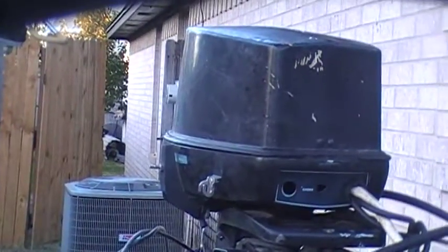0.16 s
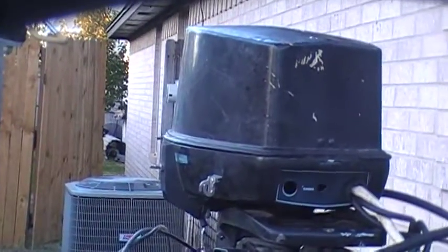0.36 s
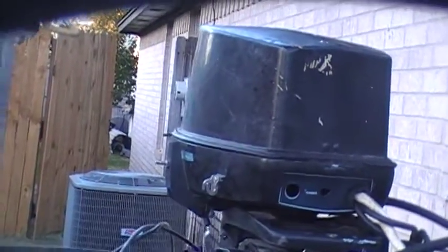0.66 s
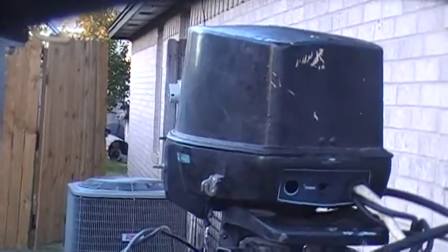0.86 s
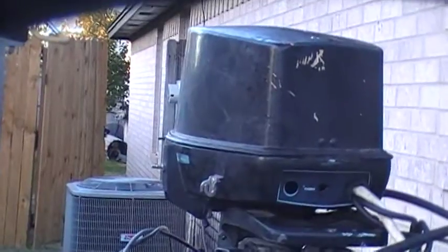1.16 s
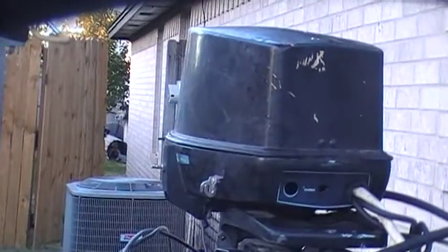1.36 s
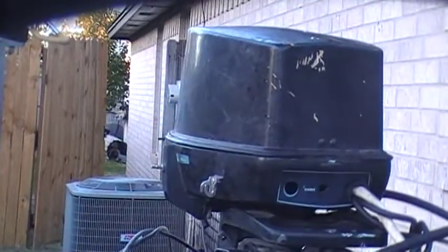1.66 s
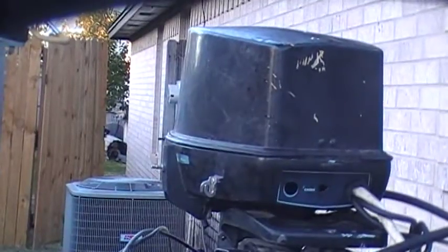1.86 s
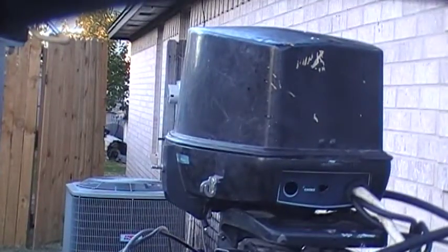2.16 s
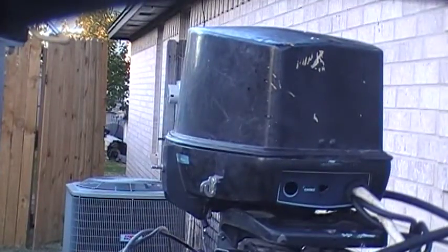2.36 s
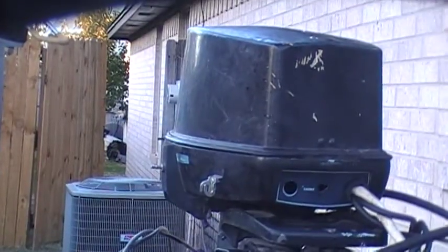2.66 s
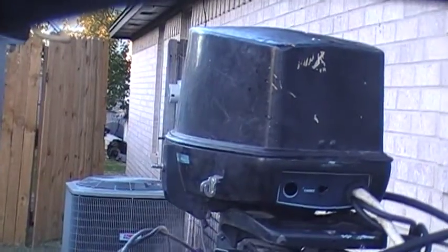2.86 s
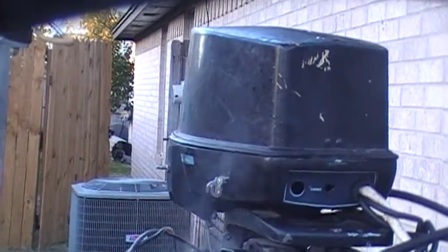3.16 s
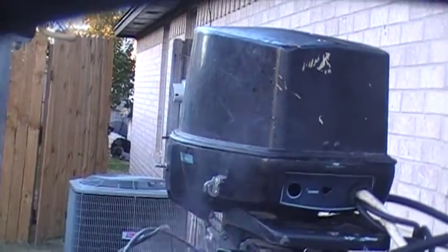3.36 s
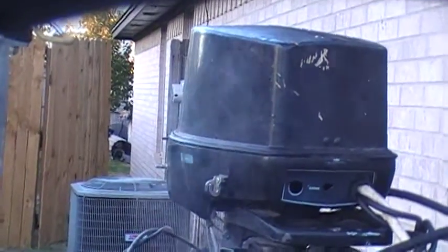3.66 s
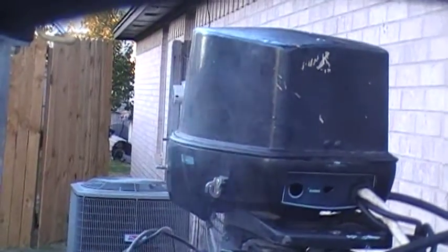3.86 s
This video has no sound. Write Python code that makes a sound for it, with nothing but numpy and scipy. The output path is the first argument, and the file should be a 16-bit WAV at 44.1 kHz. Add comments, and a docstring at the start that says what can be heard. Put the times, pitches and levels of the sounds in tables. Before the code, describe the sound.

An old outboard motor is started beside a brick wall, heard close, with a short outdoor reflection. Light ticks, then a loud metallic clash at 0.2 s, brief grinding and a rattle coasting down with a fading hum by 1.3 s. Soft fan rush, high cricket and small ticks remain. At 2.47 s it clashes again, cranks and grinds until about 2.9, then catches, knocking faster with sharp exhaust spits to 4 s.

```python
"""A fan hums and a cricket sings one high tone; then light ticks lead to an old outboard motor on a stand
beside a brick wall. The starter clashes into the flywheel and grinds; the engine coasts to a stop,
is cranked again, catches and picks up speed, spitting at the exhaust. Shaped noise makes rush, hiss and
thud; random impacts through resonances make rattle and scrape; oscillators make blade, mesh and exhaust
tones; decaying bursts make ticks, clashes and spits; a noise tail is the wall's answer."""
import sys
import numpy as np
from scipy import signal
from scipy.fft import rfft, irfft, next_fast_len
from scipy.io import wavfile
from scipy.ndimage import uniform_filter1d, map_coordinates

SR = 44100
rng = np.random.default_rng(int(sys.argv[2]) if len(sys.argv) > 2 else 0)


def wav_record(signal):
    """Record a signal, one row per channel, as 16-bit PCM in the file named by sys.argv[1]."""
    frames = np.transpose(np.atleast_2d(signal))
    bounded = np.clip(frames, -1, 1)
    # unit amplitude maps onto the largest positive 16-bit level
    quanta = np.round(bounded * 32767).astype(np.int16)
    wavfile.write(sys.argv[1], SR, quanta)


N = 176400
T = np.arange(N) / SR


def amp(db):
    """Decibel law: amplitude is ten to a twentieth of the level."""
    return 10 ** (np.asarray(db) / 20)


def unit(x):
    """Mean-square normalisation: x at rms 1."""
    return x / np.sqrt(np.mean(x ** 2) + 1e-20)


def along(points, hz):
    """Logarithmic frequency scale: (frequency [Hz], value) points joined along it."""
    f, v = np.transpose(points)
    return np.interp(np.log(hz + 1), np.log(f + 1), v)


def gains(spans):
    """Amplitude envelope: one gain curve per level column, silent outside the spans."""
    total = 0
    for rows in spans:
        times, *columns = np.transpose(rows)
        levels = [np.interp(T, times, c, left=-200, right=-200) for c in columns]
        total = total + np.array([amp(level) for level in levels])
    return total


def filtered(x, response):
    """Linear filtering: the spectrum of x times a complex response of frequency."""
    size = next_fast_len(N + SR // 2)
    return irfft(rfft(x, size) * response(np.fft.rfftfreq(size, 1 / SR)), size)[..., :N]


def causal(spectrum):
    """Minimum phase: folding the cepstrum gives a causal response, here of energy 1."""
    size = 2048
    cepstrum = irfft(np.log(amp(along(spectrum, np.fft.rfftfreq(size, 1 / SR))) + 1e-6))
    cepstrum[1:size // 2] *= 2
    cepstrum[size // 2 + 1:] = 0
    h = irfft(np.exp(rfft(cepstrum)))
    return h / np.linalg.norm(h)


def coloured(x, spectrum):
    """Convolution: x takes on the shape of a spectrum."""
    return signal.fftconvolve(x, causal(spectrum))[:N]


def modes(hz, width, db):
    """Modal superposition: damped resonators of alternating sign, width in Hz, peak gains in dB."""
    def response(f):
        total = 0
        for k, (c, gain) in enumerate(zip(hz, db)):
            total = total + (-1) ** k * amp(gain) * 1j * f * width / (c * c - f * f + 1j * f * width)
        return total
    return response


def rung(x, hz, width, db, waver_db):
    """Uneven modal excitation: each resonance is driven by its own changing share of x."""
    total = 0
    for k, (c, gain) in enumerate(zip(hz, db)):
        share = x * amp(waver_db * wobble(25.046))
        total = total + (-1) ** k * filtered(share, modes([c], width, [gain]))
    return total


def contacts(rate, spread_db):
    """Shot noise: random impacts of uneven size, rms 1."""
    hit = rng.random(N) < rate / SR
    return unit(hit * rng.standard_normal(N) * amp(spread_db * rng.standard_normal(N)))


def wobble(rate):
    """Slow random modulation: a smooth curve with rate knots a second."""
    return map_coordinates(rng.standard_normal(int(N * rate / SR) + 4), [T * rate])


def phase(hz):
    """Phase is the running integral of frequency."""
    return 2 * np.pi * np.cumsum(hz) / SR


def narrow(hz, width, db):
    """Narrow-band noise: a sharp resonance makes a slightly unsteady tone."""
    band = filtered(rng.standard_normal(N), lambda f: modes([hz], width, [0])(f) ** 2)
    return amp(db) * unit(band)


def burst(db, t60, t):
    """Exponential decay: noise with a fast rise and an even fall in decibels."""
    rise = 1 - np.exp(-t / 0.00052)
    return amp(db - 7 - 60 * t / max(t60, .01)) * rise * rng.standard_normal(len(t))


# spectrum of the fan's air rush: (frequency [Hz], relative level [dB])
FAN_SPECTRUM = [(20, -41), (130, -16), (500, -3), (1000, -1.5), (1500, -8), (2200, -16), (4000, -31.5),
                (16000, -50.5)]
# blade tone before the stereo tilt: (frequency [Hz], level [dB])
BLADE_TONE = (554.5, -52)
# the cricket's tone: (frequency [Hz], width [Hz], level outside the rests [dB])
CRICKET = (5060, 230, -68)
# quieter spells of the cricket: (start [s], end [s])
RESTS = [(1.309, 1.43), (1.88, 1.99)]
FAN_DB, FAN_WAVER_DB, REST_DB = -41.5, 1, -9
FAN_ALIKE, FAN_PAN_DB = 0.73, 1  # correlation of the two sides; tilt, plus left and minus right


def yard():
    """Partly correlated broadband noise makes the rush, a sine the blade tone, narrow noise the cricket."""
    a, b = (unit(coloured(rng.standard_normal(N), FAN_SPECTRUM)) for _ in "ab")
    u = np.arccos(np.clip(FAN_ALIKE, 0, 1)) / 2
    sides = np.array([np.cos(u) * a + np.sin(u) * b, np.cos(u) * a - np.sin(u) * b])
    rush = sides * amp(FAN_DB + FAN_WAVER_DB * wobble(3.3))
    blade_hz, blade_db = BLADE_TONE
    blade = np.sqrt(2) * amp(blade_db + 2.4 * wobble(7.2)) * np.sin(phase(blade_hz + wobble(6.3)))
    fan = (rush + blade) * amp([[FAN_PAN_DB], [-FAN_PAN_DB]])
    resting = uniform_filter1d(sum(1. * (T > p) * (T < q) for p, q in RESTS), size=900)
    return fan + amp(REST_DB * resting) * narrow(*CRICKET)


# light ticks of solenoid and linkage: (time [s], burst level [dB], t60 [s], pitch [Hz])
TICKS = [(0.019, -34.5, 0.08, 5860), (0.047, -30.5, 0.038, 6400), (.166, -18, 0.061, 2440),
         (0.705, -19.5, 0.071, 7060), (0.706, -21, 0.083, 2800), (1.576, -28.5, 0.056, 1400),
         (2.233, -35, 0.036, 2240), (2.268, -42.5, 0.048, 4000), (2.444, -18.5, 0.064, 2500)]
# spectrum of a hard metallic clack: (frequency [Hz], relative level [dB])
CLACK = [(150, -32), (600, 0), (2150, 4), (2700, -11), (9000, -17), (16000, -33.5)]
TICK_Q, TICK_WIDE_DB = 6.5, -4  # resonance quality; unpitched part against the pitched


def ticks():
    """Impulsive excitation of one broad resonance: a short burst, pitched, over its own clack."""
    out, t = np.zeros(N + SR), T[:SR // 8]
    for s, db, t60, hz in TICKS:
        blow = burst(db, t60, t)
        pitched = signal.lfilter(*signal.iirpeak(hz, TICK_Q, SR), blow)
        pitched = pitched * np.linalg.norm(blow) / np.linalg.norm(pitched)  # energy of the blow
        wide = signal.fftconvolve(blow, causal(CLACK))[:len(t)]
        out[round(s * SR):][:len(t)] += pitched + amp(TICK_WIDE_DB) * wide
    return out[:N]


# the turning engine under its cowl, in two spans:
# (time [s], rattle level [dB], thud level [dB], air hiss level [dB])
TURNING = [
    [(.189, -21, -33, -39), (.3, -20, -33, -61), (.45, -24.5, -38, -36), (.6, -28.5, -34, -50.5),
     (.8, -32, -40, -53), (1.05, -41.5, -50, -62), (1.3, -62, -55, -73)],
    [(2.467, -19.5, -30.5, -67), (2.6, -24.5, -37, -62.5), (2.97, -26.5, -34, -44.5),
     (3.39, -23, -32.5, -44), (3.59, -21.5, -31, -40.5), (4, -18, -31, -38)],
]
# engine strokes and rattling knocks of the coasting engine, before the leads:
# (crest time [s], rattle level [dB], half width [s])
SWELLS = [(0.272, -17.5, 0.0073), (0.374, -16, 0.0065), (.4, -19.5, 0.0062), (.836, -35, 0.0033),
          (0.952, -43, 0.0042), (1.005, -36, 0.0042), (1.098, -37, 0.0031), (1.153, -45, 0.0047),
          (2.546, -17.5, 0.024), (2.652, -15, 0.022), (2.736, -14, 0.026), (2.804, -14, 0.0086),
          (2.859, -12, 0.0079), (2.913, -19.5, 0.014), (3.019, -18.5, 0.012), (3.106, -22, 0.0074),
          (3.188, -19.5, 0.009), (3.265, -16, 0.0062), (3.338, -16.5, 0.0041), (3.406, -14.5, 0.0048),
          (3.468, -14.5, 0.00943), (3.523, -15, 0.006), (3.577, -13.5, 0.004), (3.635, -19.5, 0.0078),
          (3.681, -21.5, 0.02), (3.727, -22, 0.042), (3.778, -13, 0.004), (3.825, -12, 0.0054),
          (3.875, -24, 0.0066), (3.914, -18.5, 0.0068), (3.96, -20, 0.0088)]
# spectra of rattling parts, thudding block and intake air: (frequency [Hz], relative level [dB])
RATTLE = [(150, -41), (250, -13.5), (634, -5.5), (983, -1.5), (1220, -6.5), (2160, -8), (2530, -17),
          (6000, -29.5), (9000, -94.5)]
THUD = [(25, -44), (107, -8.5), (252, -1.5), (450, 0), (580, -36), (990, -120)]
HISS = [(1760, -43), (3200, -4.5), (5520, -9.5), (6810, -3), (9930, -6), (16000, -35)]
# exhaust drone, wavering about these: (time [s], pitch [Hz], level [dB])
DRONE = [(3.42, 250, -46), (3.47, 250, -30), (3.57, 251, -30), (3.6, 240, -36), (3.7, 241, -25),
         (3.78, 248, -25), (3.81, 235, -34), (3.87, 223, -30), (3.95, 226, -26), (4, 242, -26)]
# cowl resonances: (frequency [Hz]) and (gain over the rattle [dB])
COWL_HZ = [503, 610, 701, 775, 880, 981, 1065, 1405, 1693, 2095]
COWL_DB = [2.4, 7.7, 8.7, 8.3, 2.8, 8.5, 2.3, 8.3, 2.2, 5.8]
COWL_WIDTH_HZ, COWL_WAVER_DB = 42, 2.5
RATTLES_PER_S, RATTLE_SPREAD_DB = 6000, 2
RATTLE_LEAD_S, FALL_SHARE = 0.0029, 0.69  # each swell rises, then dies in this share of its rise
PUFF_DB, PUFF_LEAD_S, HISS_WAVER_DB = -19.5, .011, 3  # each swell breathes through the intake a little ahead
KNOCK_DB, KNOCK_LEAD_S, KNOCK_UNDER_S = 19, 0.002, 0.0097  # narrower ones carry one hard knock
KNOCK_HZ, KNOCK_WIDTH_HZ, KNOCK_RING_DB = [1023, 2180], 123, [14, 15]  # the block rings briefly


def swells(lead):
    """Energy addition: lopsided Gaussian swells, shifted ahead by lead seconds, sum as powers."""
    power = 0
    for s, db, w in SWELLS:
        width = np.where(T + lead < s, w, FALL_SHARE * w)
        power = power + amp(2 * db) * np.exp(-((T - s + lead) / width) ** 2)
    return np.sqrt(power)


def engine():
    """Forced vibration: swells drive rattle and intake hiss; knocks, block thud and exhaust drone join."""
    rattle, thud, hiss = gains(TURNING)
    cowl = modes(COWL_HZ, COWL_WIDTH_HZ, COWL_DB)
    cowl_response = 1 + cowl(np.fft.rfftfreq(2048, 1 / SR))
    norm = np.sqrt(np.mean(np.abs(cowl_response * rfft(causal(RATTLE))) ** 2))
    drive = np.hypot(rattle, swells(RATTLE_LEAD_S)) * contacts(RATTLES_PER_S, RATTLE_SPREAD_DB)
    shake = coloured(drive, RATTLE)
    body = (shake + rung(shake, COWL_HZ, COWL_WIDTH_HZ, COWL_DB, COWL_WAVER_DB)) / norm

    knock = np.zeros(N)
    for s, db, w in SWELLS:
        knock[round((s - KNOCK_LEAD_S) * SR)] += amp(db + KNOCK_DB) * (w < KNOCK_UNDER_S)
    block = modes(KNOCK_HZ, KNOCK_WIDTH_HZ, KNOCK_RING_DB)
    knocks = filtered(coloured(knock, RATTLE), block) / norm

    low = coloured(thud * rng.standard_normal(N), THUD)
    breath = np.hypot(hiss, amp(PUFF_DB) * swells(PUFF_LEAD_S)) * amp(HISS_WAVER_DB * wobble(47))
    air = coloured(breath * rng.standard_normal(N), HISS)

    s, hz, db = np.transpose(DRONE)
    turn = phase(np.interp(T, s, hz) + 3 * wobble(30))
    drone = np.sqrt(2) * amp(np.interp(T, s, db, left=-200) + 1.7 * wobble(45)) * np.sin(turn)
    return body + knocks + low + air + drone


# starter teeth on the flywheel ring, in two spans:
# (time [s], scrape level [dB], mesh rate [Hz], mesh tone level [dB]), before wavers and later gains
GRIND = [
    [(.19, -35, 275, -54.5), (.272, -34.5, 265.7, -22), (.295, -45, 250.5, -36), (.325, -23.5, 200, -33),
     (.355, -31.5, 576.9, -40), (.378, -21, 483, -21.5), (.41, -26.5, 490, -35.5), (.5, -67, 521.6, -63)],
    [(2.468, -55, 337.8, -44.5), (2.55, -31, 261.5, -23), (2.6, -43.5, 249.7, -41),
     (2.622, -27.5, 504, -25), (2.655, -30.5, 489.3, -17.5), (2.69, -34, 351.6, -35),
     (2.708, -26, 625, -27), (2.724, -25, 578, -21), (2.742, -27, 494, -19), (2.775, -29, 478, -29),
     (2.797, -24.5, 575, -23), (2.812, -26, 488, -24), (2.832, -29, 335, -31), (2.856, -21.5, 629.6, -17),
     (2.875, -24.5, 498, -23.5), (2.92, -32.5, 474, -34), (2.99, -50, 488, -61)],
]
# spectrum of scraping teeth: (frequency [Hz], relative level [dB])
SCRAPE = [(1290, -35.5), (2200, -7.5), (2370, -16), (4880, -26.5), (9020, -21.5), (13500, -36),
          (16000, -81)]
# multiples 1, 2, .. of the mesh rate: (relative level [dB])
MESH_DB = [0, -11, -8, -8]
# the pinion clashing into the flywheel: (time [s], burst level [dB], t60 [s], ring gain [dB])
CLASHES = [(0.1897, -1.5, 0.056, 0.5), (0.3657, -6, 0.055, 2), (2.467, -1.5, 0.069, -3),
           (2.792, -17.5, 0.054, 13.5), (2.849, -5.5, 0.033, 1)]
# flywheel modes: (frequency [Hz]) and (gain over scrape or clash [dB])
RING_HZ = [3188, 3810, 4098, 4225, 4620, 5398, 5498, 6460, 6772, 7475, 7620, 8703, 10200, 11500]
RING_DB = [13, 18.6, 27.8, 15, 16, 14.5, 14, 14.4, 12, 18, 10, 19.2, 14, 4.4]
# hum of the freewheeling starter: (time [s], level [dB])
COAST = [
    [(.5, -34), (.56, -28), (.71, -31.5), (.8, -39), (.9, -33.5), (1.05, -54)],
]
TEETH_PER_S, TEETH_SPREAD_DB = 5000, 2
RING_WIDTH_HZ, RING_WAVER_DB = 21, 3
COAST_HZ, COAST_WIDTH_HZ = 978, 22
HOUSING_DB = 17  # the starter housing lifts the mesh tone near its hum pitch


def starter():
    """Gear-mesh excitation: teeth scrape and sing, clashes clack, both ring the flywheel; a hum fades."""
    scrape, mesh = gains([[(s, a, b) for s, a, _, b in rows] for rows in GRIND])
    s, _, hz, _ = np.transpose(GRIND[0] + GRIND[1])
    turn = phase(np.interp(T, s, hz) * (1 + 0.0098 * wobble(60)))
    partials = [amp(db + 3.1 * wobble(40)) * np.sin((k + 1) * turn) for k, db in enumerate(MESH_DB)]
    tone = mesh * sum(partials)
    tone = tone + filtered(tone, modes([COAST_HZ], 2 * COAST_WIDTH_HZ, [HOUSING_DB]))
    teeth = scrape * amp(0.71 * wobble(80)) * contacts(TEETH_PER_S, TEETH_SPREAD_DB)

    clack, struck = np.zeros(N + SR), np.zeros(N + SR)
    for s, db, t60, ring_db in CLASHES:
        blow = burst(db, t60, T[:SR // 4])
        clack[round(s * SR):][:len(blow)] += blow
        struck[round(s * SR):][:len(blow)] += amp(ring_db) * blow
    scraped_ring = rung(teeth, RING_HZ, RING_WIDTH_HZ, RING_DB, RING_WAVER_DB)
    struck_ring = filtered(struck[:N], modes(RING_HZ, RING_WIDTH_HZ, RING_DB))

    hum = gains(COAST)[0] * narrow(COAST_HZ, COAST_WIDTH_HZ, 0)
    contact = amp(-2.0) * coloured(teeth, SCRAPE) + coloured(clack[:N], CLACK)
    return contact + scraped_ring + struck_ring + tone + hum


# sharp spits at the exhaust: (time [s], level before SPIT_DB and filter [dB], pitch [Hz])
SPITS = [(0.6848, -15.5, 5980), (0.8656, -32, 6030), (3.001, -18, 6710), (3.029, -11, 9700),
         (3.1662, -3.5, 8030), (3.3278, -17.5, 5830), (3.336, -17.5, 6300), (3.4076, -11, 6240),
         (3.4885, -14, 9600), (3.6212, -19, 6580), (3.7383, -10.5, 7100)]
SPIT_T60_S, SPIT_DB = .004, 3
SPIT_HZ, SPIT_WIDTH_HZ = 7870, 70000


def spits():
    """Damped oscillation: each spit is a quickly dying high tone mixed with noise."""
    out, t = np.zeros(N + SR), T[:SR // 50]
    for s, db, hz in SPITS:
        tone = np.sin(2 * np.pi * hz * t) + .5 * rng.standard_normal(len(t))
        rise = 1 - np.exp(-t / 0.000067)
        out[round(s * SR):][:len(t)] += amp(db + SPIT_DB - 60 * t / SPIT_T60_S) * rise * tone
    return filtered(out[:N], lambda f: modes([SPIT_HZ], SPIT_WIDTH_HZ, [0])(f) ** 4)


# decay of the wall's answer: (frequency [Hz], t60 [s])
WALL_DECAY = [(200, 0.33), (2000, 0.16), (10000, 0.075)]


def wall(x):
    """Reverberation: a delayed noise tail in which each frequency dies at its own speed."""
    hz, t, z = signal.stft(rng.standard_normal((2, SR // 2)), SR, nperseg=256)
    decay = amp(-60 * t / along(WALL_DECAY, hz)[:, None])
    tail = signal.istft(z * decay, SR, nperseg=256)[1]
    delayed = np.pad(x, (200, 0))[None]  # samples
    return signal.fftconvolve(delayed, tail / np.linalg.norm(tail[0]), axes=1)[:, :N]


# left over right in the direct sound: (frequency [Hz], level difference [dB])
BALANCE = [(120, 0.5), (550, 2), (1650, 1), (4970, -3.5), (15000, 6.5)]
# tone of the sound sent to the wall: (frequency [Hz], gain [dB])
WALL_BRIGHT = [(300, -6), (9000, 3.5)]
WALL_DB = -11.5


def scene():
    """Superposition: direct motor sound, its answer from the wall and the yard add up."""
    motor = ticks() + engine() + starter() + spits()
    near = filtered(motor, lambda f: amp(np.outer([.5, -.5], along(BALANCE, f))))
    sent = filtered(motor, lambda f: amp(along(WALL_BRIGHT, f)))
    return yard() + near + amp(WALL_DB) * wall(sent)


# microphone response: (frequency [Hz], gain [dB])
MIC = [(100, -0.5), (13000, -0.5), (16000, -23.5)]
TOP_HZ = 16100


def record(dry):
    """Band limiting: the microphone thins the top, peaks clip, nothing is kept above the limit."""
    heard = filtered(dry, lambda hz: amp(along(MIC, hz)))
    return filtered(np.clip(heard, -1, 1), lambda hz: hz < TOP_HZ)


dry = scene()
out = record(dry)
wav_record(out)
```